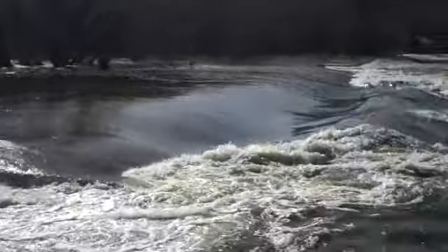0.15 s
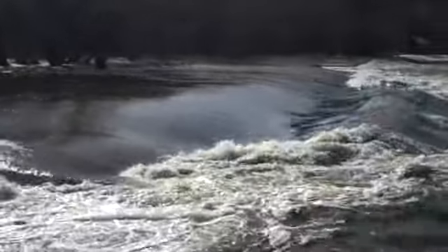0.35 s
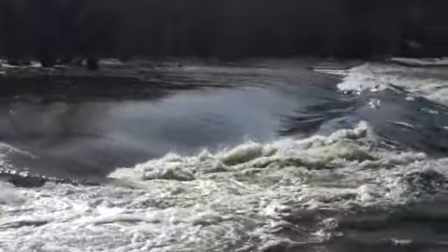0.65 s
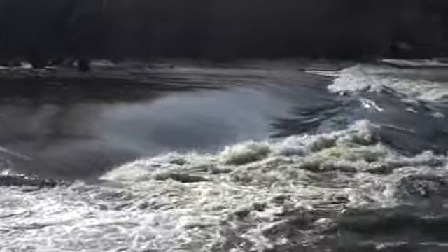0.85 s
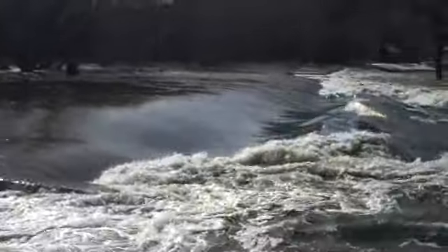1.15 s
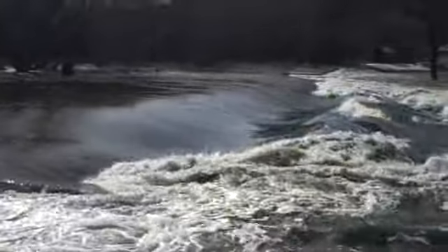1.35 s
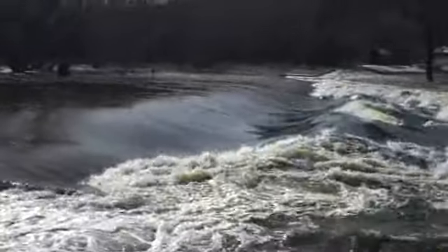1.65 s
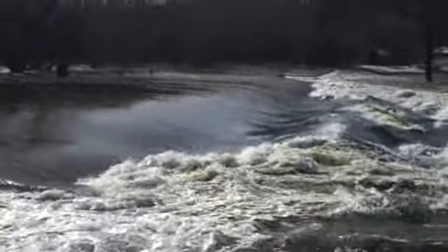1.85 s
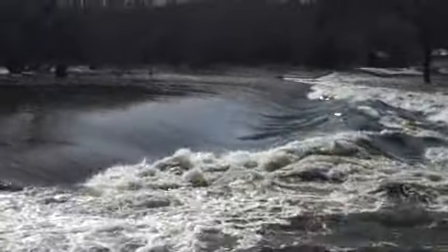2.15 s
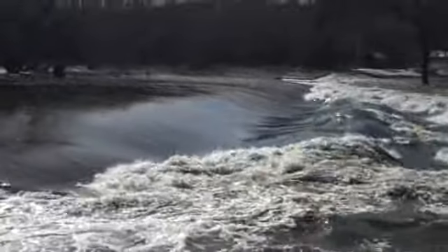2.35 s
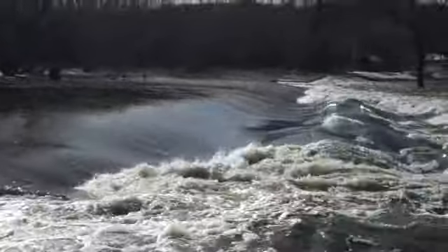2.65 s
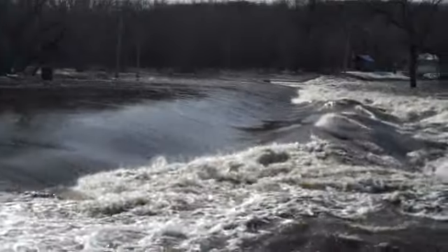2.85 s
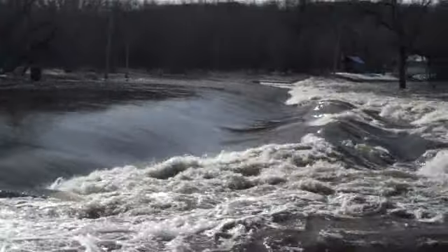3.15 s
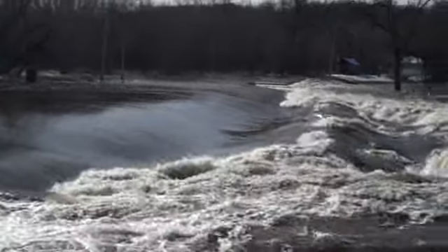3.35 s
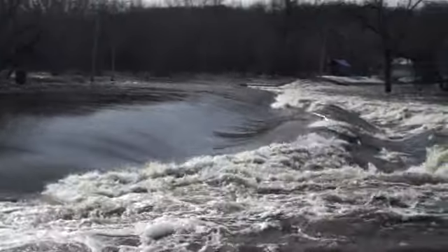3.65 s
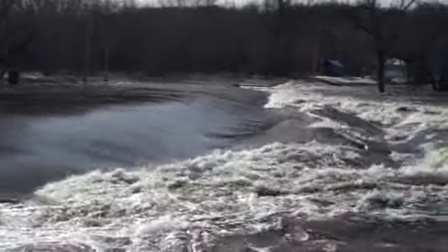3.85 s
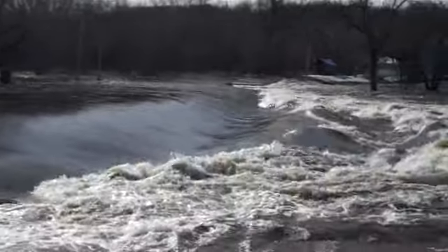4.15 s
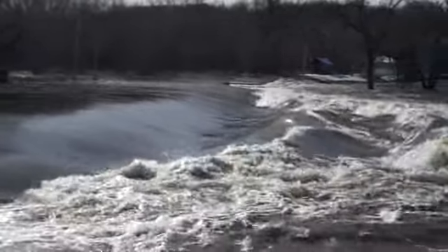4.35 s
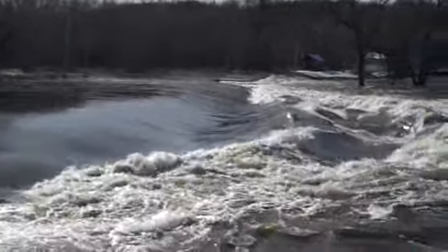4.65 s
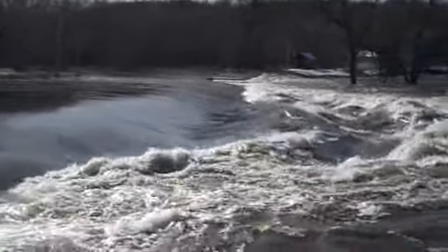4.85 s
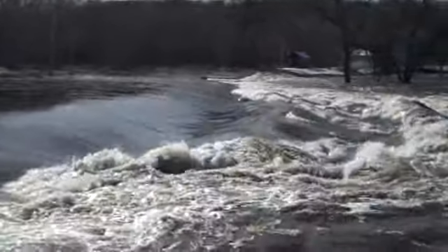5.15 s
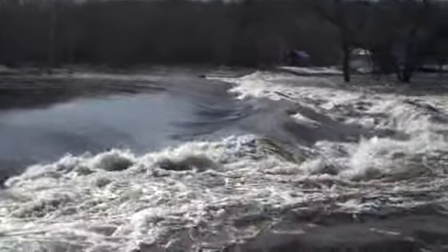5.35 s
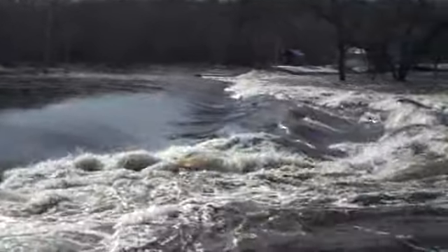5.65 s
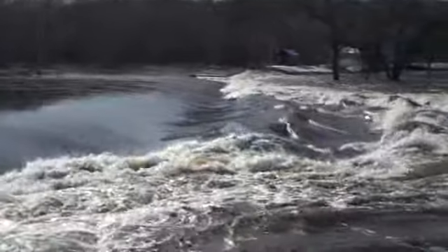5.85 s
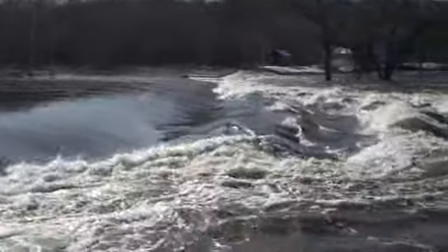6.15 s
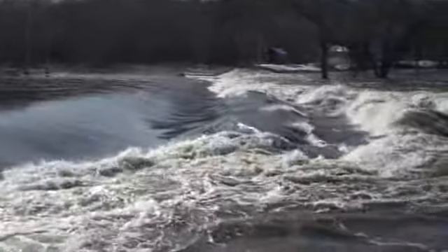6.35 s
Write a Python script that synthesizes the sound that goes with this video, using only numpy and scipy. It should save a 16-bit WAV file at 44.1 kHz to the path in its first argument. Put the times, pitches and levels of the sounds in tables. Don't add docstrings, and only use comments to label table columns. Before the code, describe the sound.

Floodwater roars steadily over a low dam with bright foam fizz, while an early wind gust thumps and flutters on a small, coarse camera microphone.

```python
import sys
import numpy as np
from scipy import signal
from scipy.fft import rfft, irfft, next_fast_len
from scipy.io import wavfile
from scipy.ndimage import uniform_filter1d, map_coordinates

SR = 44100
rng = np.random.default_rng(int(sys.argv[2]) if len(sys.argv) > 2 else 0)


def level_to_linear(level):
    exponent = np.asarray(level, float) / 20
    return 10 ** exponent


def store_pcm(level_fs):
    pcm = np.round(np.clip(level_fs, -1, 1) * 32767).astype(np.int16)
    wavfile.write(sys.argv[1], SR, np.atleast_2d(pcm).T)


N = 286209
CAM_SR, BLOCK = 16000, 512
UP, DOWN = 441, 160


def unit(x):
    return x / np.sqrt(np.mean(x ** 2) + 1e-20)


def along(points, hz):
    f, v = np.transpose(points)
    return np.interp(np.log(hz + 1), np.log(f + 1), v)


def over_time(points):
    s, value = np.transpose(points)
    return np.interp(np.arange(N) / SR, s, value)


def bumps(rows):
    t = np.arange(N) / SR
    return sum(level_to_linear(db) * np.exp(-8 * ((t - s) / length) ** 2) for s, db, length in rows)


def wobble(rate):
    return map_coordinates(rng.standard_normal(int(N * rate / SR) + 4), [np.arange(N) * rate / SR])


def coloured(x, spectrum):
    m = next_fast_len(N + 8192)
    gain = level_to_linear(along(spectrum, np.fft.rfftfreq(m, 1 / SR)))
    return unit(irfft(rfft(x, m) * gain, m)[:N])


def rush(patchy_db):
    z = signal.stft(rng.standard_normal(N), nperseg=512)[2]
    patches = uniform_filter1d(rng.standard_normal(z.shape), size=6, axis=0)
    patches = uniform_filter1d(patches, size=10, axis=1)
    return unit(signal.istft(z * level_to_linear(patchy_db * unit(patches)), nperseg=512)[1][:N])


def bubbles(count, hz, spread, cycles, scatter_db, size):
    draw = rng.random((count, 3))
    t = np.arange(size) / SR
    pitch = hz * np.exp(spread * 2 * (draw[:, 1:2] - .5))
    turns = pitch * t
    ring = np.sin(2 * np.pi * turns * (1 + .12 * turns / cycles))
    ring = ring * np.exp(-3 * turns / cycles) * (1 - np.exp(-turns))
    ring = ring * level_to_linear(-scatter_db * np.log(draw[:, 2:] + 0.0018))
    at = (draw[:, :1] * N).astype(int) + np.arange(size)
    return unit(np.bincount(at.ravel(), ring.ravel(), N + size)[:N])


# (time [s], level [dB])
FLOW_SURGE = [
    (0, -1),
    (.2, 0),
    (1.08, -0.7),
    (2, 0),
    (2.64, -.5),
    (3.16, 0.35),
    (4.7, 0),
    (5.44, 0.07),
    (6.49, .8),
]


def water():
    flow_db = over_time(FLOW_SURGE)
    surge_db = .5 * wobble(3)
    roar_db = -34.5 + flow_db + surge_db + 0.37 * wobble(9)
    fizz_db = -34 + .5 * flow_db + surge_db + .4 * wobble(11)
    return level_to_linear(roar_db) * roar() + level_to_linear(fizz_db) * fizz()


# (frequency [Hz], level [dB per Hz])
ROAR_TONE = [(40, -40), (110, -24.5), (165, -5.5), (260, -2.5), (450, -8), (700, 0), (950, -3.5),
             (1500, -8.5), (3000, -25.5)]


def roar():
    notes = bubbles(count=1500, hz=748.5, spread=.6, cycles=6.4, scatter_db=1.5, size=700)
    return coloured(rush(patchy_db=0.6) + .08 * notes, ROAR_TONE)


# (frequency [Hz], level [dB per Hz])
FIZZ_TONE = [(500, -24), (1200, -4.5), (2200, 0.5), (3200, -1), (4200, -4), (4950, -3.5), (5200, -9.5),
             (5900, -7.5), (8000, -22)]


def fizz():
    notes = bubbles(count=9000, hz=2786, spread=.8, cycles=4, scatter_db=2, size=120)
    return coloured(rush(patchy_db=.7) + .25 * notes, FIZZ_TONE)


def wind():
    return buffet() + flutter() + slaps()


# (time [s], level [dB])
STEADY_WIND = [(0, -57.5), (.15, -45), (.72, -44), (.78, -55.5), (1, -50.5), (1.7, -52.5), (2.4, -49),
               (2.93, -52), (3.02, -60), (4.15, -58.5), (4.5, -56), (5.1, -56), (5.22, -59), (5.9, -55),
               (6.49, -56.5)]
# (time [s], peak level [dB], length [s])
EDDIES = [(.215, -37.5, .13), (.39, -41, .14), (.58, -35, .16), (.7, -42, .07), (.88, -48, .05),
          (1.1, -49, .15), (1.33, -48, .06), (1.65, -52, .07), (2, -47, .1), (2.27, -47, .07),
          (2.52, -47.5, .12), (2.66, -52, .05), (2.86, -50.5, .1), (3.33, -50, .12), (4.5, -53, .08),
          (4.87, -52, .08), (5.02, -44, .08), (5.15, -49.5, .05), (5.9, -53, .12), (6.35, -54, .06)]
# (frequency [Hz], level [dB per Hz])
BUFFET_TONE = [(15, -40), (40, -11), (110, 0.5), (200, -4.5), (500, -13), (1100, -30.5), (2500, -56)]


def buffet():
    rumble = coloured(rng.standard_normal(N), BUFFET_TONE)
    rumble = unit(level_to_linear(2.5 * wobble(25)) * rumble)
    return (level_to_linear(over_time(STEADY_WIND)) + bumps(EDDIES)) * rumble


# (time [s], peak level [dB], length [s])
FLUTTER_BURSTS = [
    (.21, -42, .12),
    (.33, -38, .1),
    (.455, -38, .06),
    (.58, -32.5, .08),
    (.645, -34, .06),
]
# (frequency [Hz], level [dB per Hz])
FLUTTER_TONE = [(80, -28.5), (160, 0), (350, 0.5), (700, -7), (1200, -26)]


def flutter():
    squall_db, end_s, fade_s = -39, .73, .03
    flapping = unit(level_to_linear(2.5 * wobble(40)) * coloured(rng.standard_normal(N), FLUTTER_TONE))
    squall = level_to_linear(squall_db) * (1 - np.tanh((np.arange(N) / SR - end_s) / fade_s)) / 2
    return (squall + bumps(FLUTTER_BURSTS)) * flapping


# (time [s], peak level [dB], pitch [Hz])
AIR_SLAPS = [(.19, -20, 279), (0.216, -16.5, 150), (.252, -15, 481), (.455, -24, 180), (.53, -12.5, 230),
             (0.579, -18, 372), (.638, -16, 302), (.685, -27, 60), (.815, -27, 60), (1.39, -30, 50),
             (1.562, -24, 55), (1.72, -19, 200.6), (1.892, -20, 70), (2.09, -27, 90), (2.355, -27, 60),
             (2.95, -28, 60), (3.29, -28, 80), (3.38, -30, 100), (4.85, -31, 80), (5.0, -18, 329),
             (5.022, -18, 247.4), (5.075, -21, 260), (5.27, -28, 100), (5.4, -25, 270), (6.34, -33, 70)]


def slaps():
    out = np.zeros(N + SR)
    t = np.arange(SR // 10) / SR
    for s, db, hz in AIR_SLAPS:
        fall = level_to_linear(db - 8.5 - 60 * t / (.03 + 1.2 / hz))
        rise = 1 - np.exp(-t / 0.0011)
        out[round(s * SR):][:len(t)] += fall * np.sin(2 * np.pi * hz * t) * rise
    return out[:N]


def scene():
    return np.tile(water() + wind(), (2, 1))


# (time [s], level [dB], hiss level [dB])
LOUD_HALVES = [(0, 6.5, -4), (.064, 6.5, 4), (.192, 8, 11), (.224, 6.5, 12), (.256, 8, 15.5), (.544, 6, 7),
               (1.12, 7.5, 6), (1.696, 7.5, 19), (1.728, 8.5, 16.5), (1.888, 8, 0), (1.984, 8, 9.5),
               (2.08, 4, -6), (2.112, 7.5, 3), (2.144, -3, 6), (2.368, 8, 17), (2.4, 4, 11.5),
               (2.752, 6.5, 12.5), (2.88, 6, 10), (3.424, 6, -1), (3.456, 7.5, 6), (3.648, 4.5, 14.5),
               (4.224, 6, 15.5), (4.992, 8.5, 15.5), (5.024, 8, 9.5), (5.056, 1.5, 0), (5.088, 7, 15),
               (5.408, 5, 19), (5.664, 5, 16), (5.92, 5, 12), (6.048, 6.5, 14.5)]
# (time [s], level [dB], hiss level [dB])
THIN_BLOCKS = [(.384, 1.5, -21), (.608, 0, -16), (.768, 1, -17), (.864, 2, -17), (.928, 1.5, -16),
               (1.408, -2.5, -16), (2.176, -.5, -15), (2.208, -0.5, -20), (3.296, 2, 1), (3.392, -0.5, -15),
               (4.096, 0, -10), (4.544, -1.5, -28), (4.768, 0, -12), (4.8, .5, -19), (4.864, 0, -6),
               (4.928, -.5, -13), (5.248, 1, -10), (5.856, 2.5, -18), (6.016, -0.5, -11), (6.08, 5.5, 4),
               (6.176, -0.5, -22)]


def camera_storage(x):
    count = len(x) // BLOCK + 3
    edge_db = 6.5 * rng.standard_normal(count)
    gain_db, hiss_db, marked = by_block(THIN_BLOCKS, count)
    thin = [gain_db, gain_db / 2, -2 * np.abs(edge_db) * marked, hiss_db, gain_db + .3 * hiss_db]
    gain_db, hiss_db, split = by_block(LOUD_HALVES, count)
    loud = [gain_db, 1.15 * gain_db, edge_db + 2, hiss_db, 10.5 + .8 * gain_db]
    latest = np.maximum.accumulate(split * np.arange(count)).astype(int)
    long = stored_blocks(x, size=BLOCK, gains=np.transpose(thin), rounding=.45,
                         bright_db=-0.5, swaps=0.98, uneven_db=.8)
    short = stored_blocks(x, size=BLOCK // 2, gains=np.transpose(loud)[latest], rounding=.39,
                          bright_db=5.5, swaps=5, uneven_db=2.2)
    in_half = np.repeat(split, BLOCK)[BLOCK // 2:][:len(x)]
    turn = np.pi / 2 * uniform_filter1d(in_half, size=BLOCK // 2)
    return long * np.cos(turn) + short * np.sin(turn)


def by_block(rows, count):
    s, *cols = np.transpose(rows)
    out = np.zeros((3, count))
    out[:, np.round(s * CAM_SR / BLOCK).astype(int)] = [*cols, np.ones_like(s)]
    return out


# (frequency [Hz], level [dB])
ROUNDING_STEP = [(50, -26.5), (500, -25.5), (1200, -24.5), (2400, -24), (3500, -26), (5000, -27),
                 (6000, -29)]


def stored_blocks(x, size, gains, rounding, bright_db, swaps, uneven_db):
    lead = (BLOCK - size) // 2
    n, k = np.arange(2 * size) + .5, np.arange(size) + .5
    window = np.sqrt(2 / size) * np.sin(np.pi * n / 2 / size)
    basis = window[:, None] * np.cos(np.pi / size * np.outer(n + size / 2, k))
    hz = k * CAM_SR / 2 / size
    padded = np.pad(x, (size + lead, 2 * size))
    lines = np.lib.stride_tricks.sliding_window_view(padded, 2 * size)[::size] @ basis
    gains = gains[np.round((np.arange(len(lines)) * size - lead) / BLOCK).astype(int)]

    step = level_to_linear(along(ROUNDING_STEP, hz) + .8 * rng.standard_normal((len(lines), 1)))
    noise = rng.uniform(-1, 1, lines.shape) * np.sqrt(3)
    whole_steps = np.sign(lines) * np.floor(np.abs(lines) / step + rounding)
    lines = step * (whole_steps + level_to_linear(-26.0) * noise)

    lines = lines * level_to_linear(level_errors(hz, gains, bright_db, uneven_db))
    lines = hiss_for_treble(lines, noise, hz, gains, swaps)
    halves = (lines @ basis.T).reshape(len(lines), 2, size)
    return (halves[1:, 0] + halves[:-1, 1]).ravel()[lead:][:len(x)]


def level_errors(hz, gains, bright_db, uneven_db):
    treble = np.clip(np.log2(hz / 700) / 0.98, 0, 1)
    spared = .3 * np.exp(-np.log(hz / 1400) ** 2 / .15)
    uneven = np.repeat(rng.standard_normal((len(gains), len(hz) // 16)), 16, axis=1)
    error_db = uneven_db * uneven * treble - spared * gains[:, :1]
    error_db = error_db + gains[:, :1] * treble + gains[:, 1:2] * (1 - treble)
    return error_db + bright_db * np.clip(hz / 4000 - .6, -1, 1)


# (from [Hz], to [Hz], share of blocks [0-1])
HISS_BANDS = [(4000, 5300, .25), (5300, 6000, .7), (6000, 6330, 1), (6330, 7280, 1), (7280, 8000, 1)]
# (frequency [Hz], level [dB per line])
HISS_LEVEL = [(4000, -39), (5250, -40), (5350, -30.5), (5600, -44), (5950, -47), (6020, -46), (6300, -51.5),
              (6350, -48.5), (7250, -47.5), (7300, -62), (8000, -60.5)]


def hiss_for_treble(lines, noise, hz, gains, swaps):
    hiss_gain = gains[:, [0, 0, 2, 3, 4]] + 0.92 * rng.standard_normal((len(lines), len(HISS_BANDS)))
    chance = rng.random(hiss_gain.shape)
    for band, (low, high, share) in enumerate(HISS_BANDS):
        swap = (hz > low) & (hz < high) & (chance[:, [band]] < share ** swaps)
        hiss = noise * level_to_linear(along(HISS_LEVEL, hz) + hiss_gain[:, [band]])
        lines = np.where(swap, hiss, lines)
    return lines


# (frequency [Hz], level [dB])
PLAYBACK_FILTER = [(6500, -0.5), (7400, -1.5), (8000, -8.5), (8600, -19), (9100, -43), (9300, -77)]


def played_back(x):
    turns = len(x) // DOWN + 2
    low = rfft(x, turns * DOWN)
    mirrored = np.concatenate([low, np.conj(low[-2::-1])])
    hz = np.arange(len(mirrored)) * CAM_SR / (turns * DOWN)
    return irfft(mirrored * level_to_linear(along(PLAYBACK_FILTER, hz)), turns * UP)[:N] * UP / DOWN


def roll_off(x):
    return signal.sosfilt(signal.butter(12, 9110, fs=SR, output="sos"), x)


def record(dry):
    at_camera = signal.resample_poly(dry[0], DOWN, UP)
    sound = played_back(camera_storage(at_camera))
    return roll_off(np.tile(sound, (2, 1)))


dry = scene()
out = record(dry)
store_pcm(out)
```